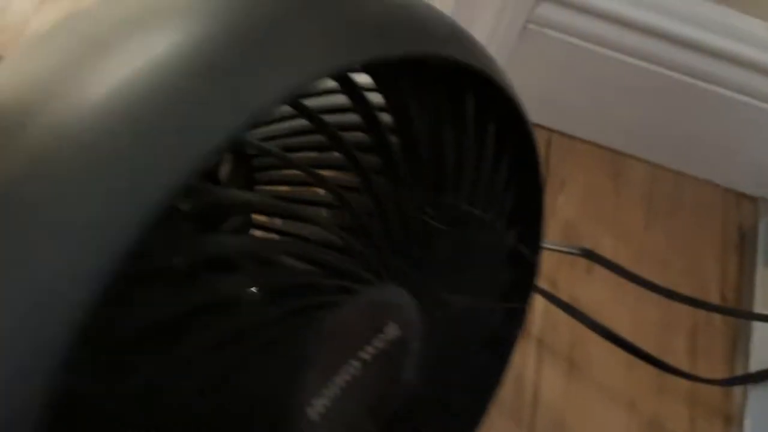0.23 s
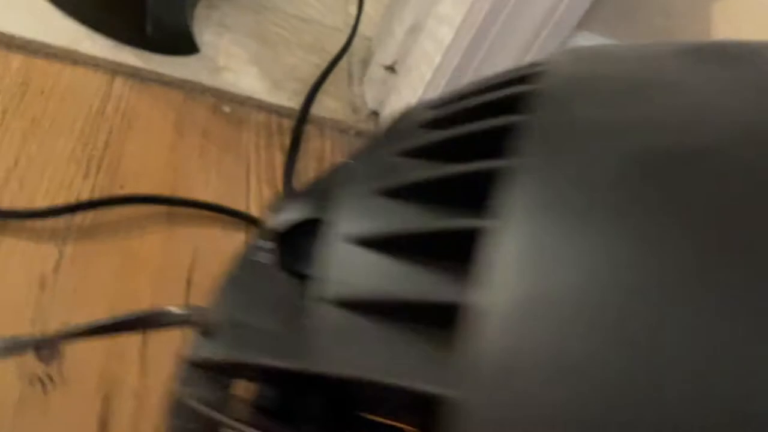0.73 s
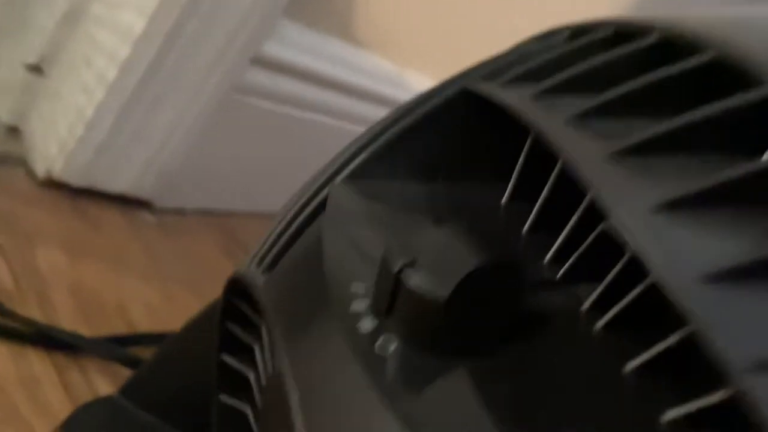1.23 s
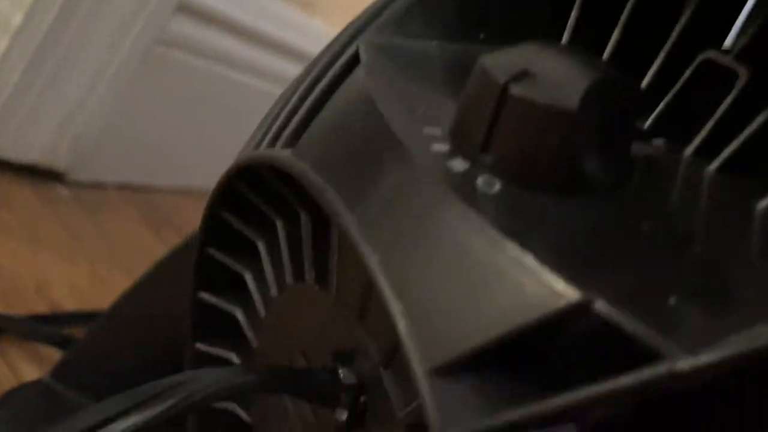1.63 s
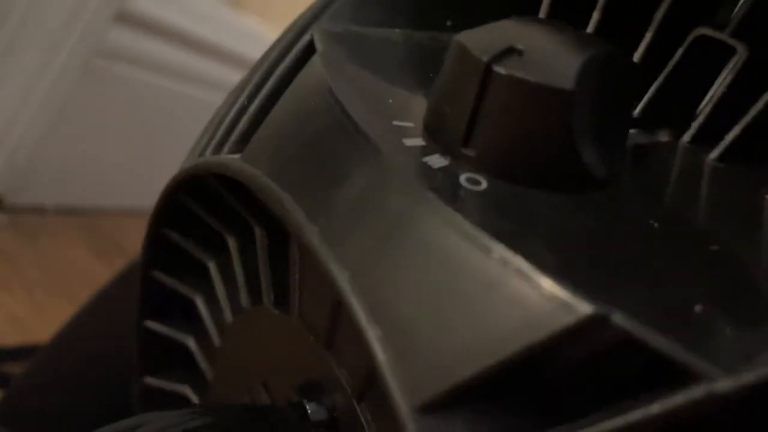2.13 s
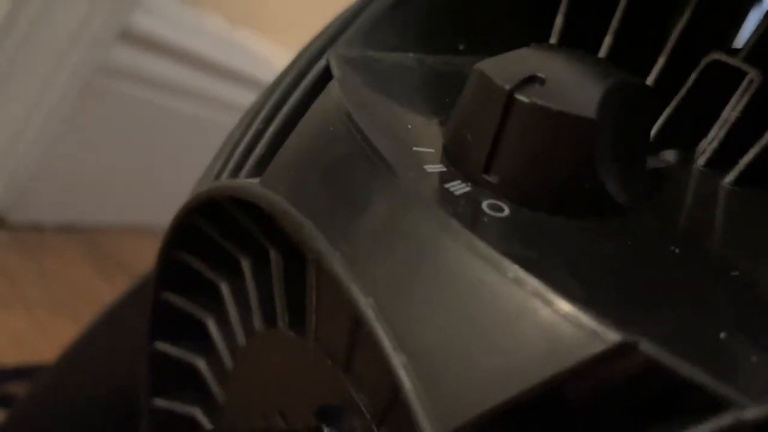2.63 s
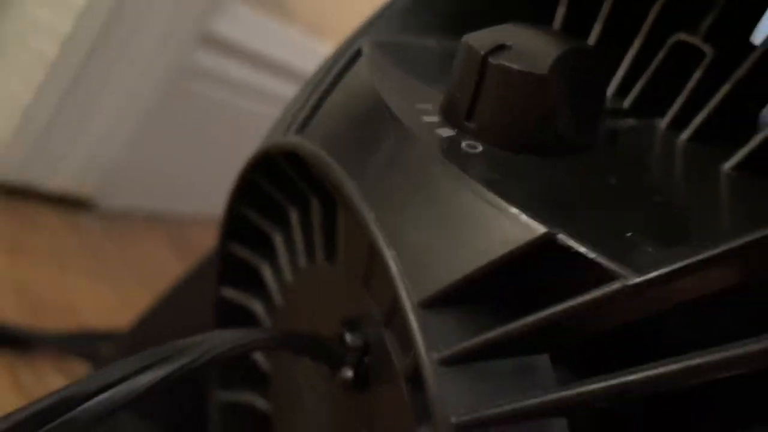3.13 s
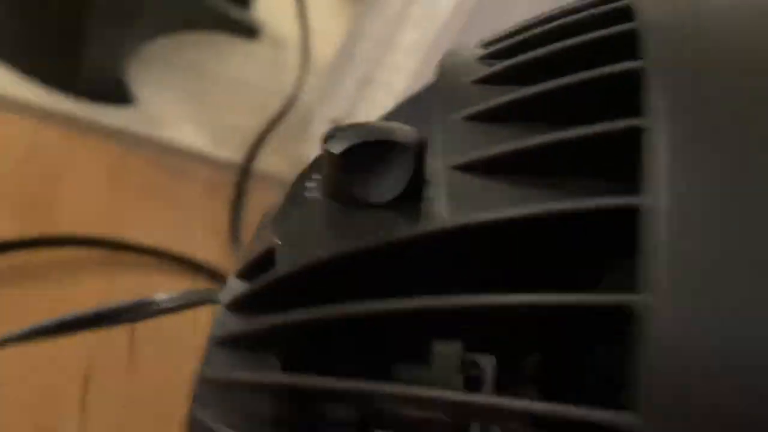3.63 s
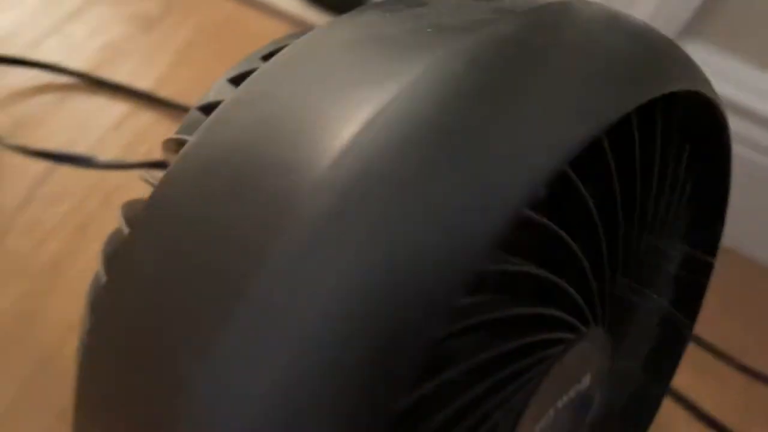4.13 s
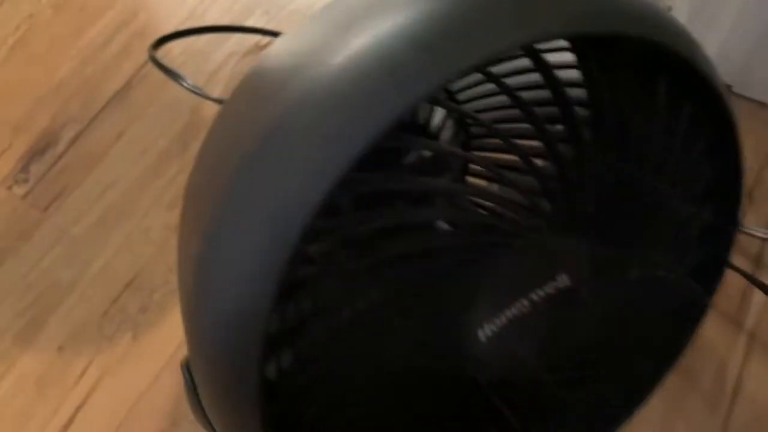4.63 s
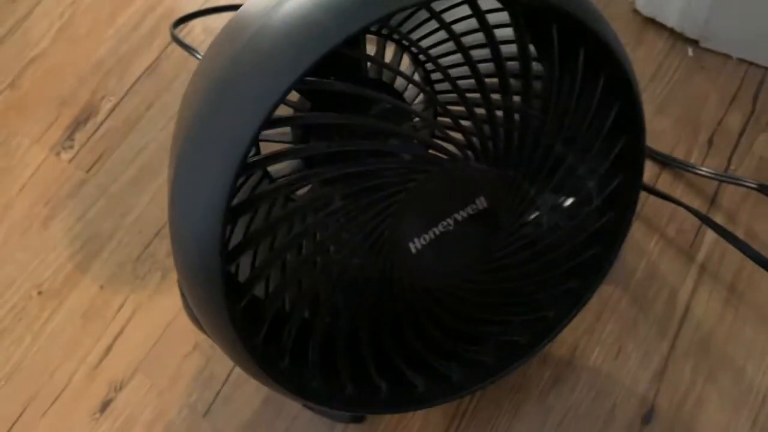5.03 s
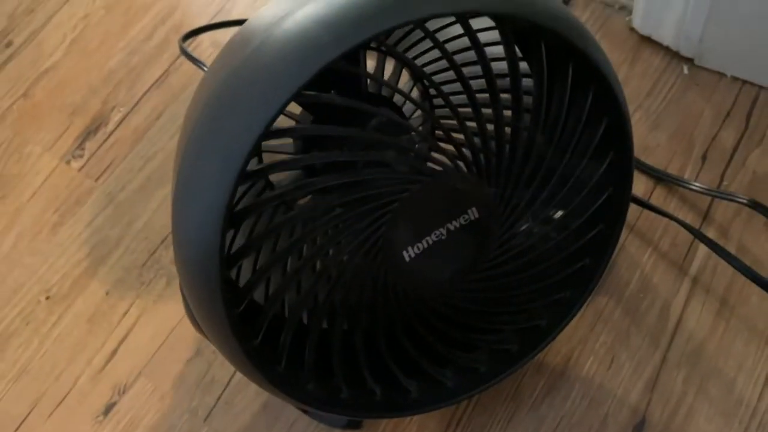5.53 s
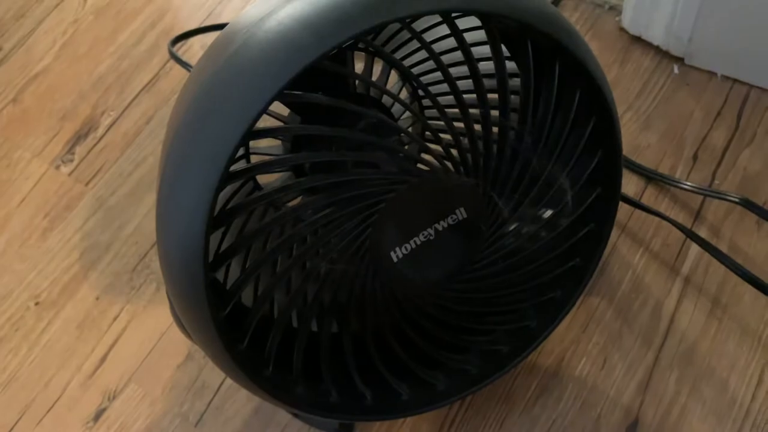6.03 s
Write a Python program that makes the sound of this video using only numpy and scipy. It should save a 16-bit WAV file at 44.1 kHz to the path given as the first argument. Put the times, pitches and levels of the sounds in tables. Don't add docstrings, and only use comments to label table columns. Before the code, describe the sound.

A small electric fan runs indoors, heard very close in stereo. Soft airy rush and a low hum dip briefly as the microphone passes the rim, then swell into a full, buzzing drone behind. Dry ticks and fine crackle ride on top. At nearly four seconds the drone drops away, leaving thinner rush, low wind buffeting and a few hard thumps.

```python
import sys
import numpy as np
from scipy import signal
from scipy.fft import rfft, irfft
from scipy.io import wavfile
from scipy.ndimage import uniform_filter1d

SR = 44100
rng = np.random.default_rng(int(sys.argv[2]) if len(sys.argv) > 2 else 0)


def dump_mix(stems):
    frames = np.atleast_2d(stems).T
    limited = np.clip(frames, -1, 1)
    pcm = np.round(limited * 32767).astype(np.int16)
    wavfile.write(sys.argv[1], SR, pcm)


def natural_amplitude(level_db):
    exponent = np.asarray(level_db, float) / 20
    return 10 ** exponent


N = 277212

BLADE_HZ = 93.33
NEAR_M, BASS_DB_PER_M = 0.31, -28
# (out [s], back [s])
RIM_S = (0.535, 3.91)
# (time [s], share behind fan [0-1], rush level [dB], left minus right [dB], distance [m])
PATH = [(0, 0, -1, 4, 0.091), (.2, 0.02, 1, 0.5, 0.32), (.55, .02, -0.5, -1.2, 0.22),
        (.85, 0.49, -.2, 1, 0.29), (1.35, 0.98, -1.1, -0.7, 0.25), (1.6, 0.73, 1.6, -1, 0.23),
        (2.4, 0.84, 0.9, -1.2, 0.23), (3.2, 0.87, 0.1, -0.5, 0.25), (3.6, 0.41, -1.5, 1.5, 0.27),
        (3.85, 0.12, -1, -1.7, 0.2), (4.3, 0.01, 1.4, -1.6, .28), (4.7, 0.17, 0.8, .2, 0.32),
        (5.25, 0.01, 2, .4, 0.57), (5.75, 0.21, -0.15, 0.5, 0.35), (6.29, .15, 0.2, 1.3, 0.47)]
# (frequency [Hz], right lead [rad], likeness [0-1], left minus right [dB])
PORTS = [(60, .1, .9, .5), (330, -.2, .76, 4.4), (600, .6, .31, 5.9), (1100, -.1, .66, 3.1),
         (1900, .1, .81, 2.6), (3100, -.6, .76, 4.9), (5200, -.05, .72, 3.5), (6100, 1.2, .6, 5),
         (6900, 2.85, .96, .3), (8000, 3.45, .96, 0), (10300, 5.95, .97, 0), (12200, 6.6, .97, 0),
         (14100, 9.15, .95, 0), (15700, 10.1, .95, 0)]
# (time [s], depth [dB], half length [s])
LULLS = [
    (4.965, -4.5, 0.032),
    (5.43, -9, 0.041),
    (6.156, -6.5, .06),
]


def evened(x):
    return x / np.sqrt(np.mean(abs(x) ** 2) + 1e-20)


def curve(rows, t):
    s, *columns = np.transpose(rows)
    return [np.interp(t, s, c) for c in columns]


def colour(rows, hz):
    f, *columns = np.transpose(rows)
    return [np.interp(np.log(hz + 1), np.log(f + 1), c) for c in columns]


def bumps_db(rows, t):
    return sum(db * np.exp(-((t - s) / half_s) ** 2) for s, db, half_s in rows)


def drift(rate_hz):
    b, a = signal.butter(2, rate_hz, fs=SR)
    return evened(signal.lfilter(b, a, rng.standard_normal(N + SR))[SR:])


def sides(pan_db):
    pair = natural_amplitude(np.array([pan_db / 2, -pan_db / 2]))
    return pair / pair.mean(0)


def through_ports(z, hz):
    lead, _, pan_db = colour(PORTS, hz)
    return sides(pan_db) * np.exp(1j * lead * np.array([[-.5], [.5]])) * z


def heave():
    # (time [s], level [dB])
    heave_track = [
        (4.1, -58),
        (5.55, -61),
        (5.95, -43),
        (6.29, -40.5),
    ]
    low_hz, top_hz = 32, 70
    b, a = signal.butter(2, low_hz, "high", fs=SR)
    pressure = evened(signal.lfilter(b, a, drift(top_hz)))
    return natural_amplitude(curve(heave_track, np.arange(N) / SR)[0]) * pressure


def draught():
    # (time [s], level [dB], left minus right [dB])
    draught_track = [(0, -36, 1), (.2, -38, 6), (.3, -45, 3), (4.15, -44, 1), (4.55, -36, -1),
                     (5.0, -33.5, -4), (5.5, -32.5, -3), (6.1, -31, -1), (6.29, -33, -1)]
    # (frequency [Hz], level [dB per Hz])
    buffet_spectrum = [(20, -30.5), (50, -10.5), (80, 6.5), (125, 2), (170, -13.5), (300, -16.5),
                       (600, -39), (1500, -64), (4000, -120)]
    # (time [s], level [dB], left minus right [dB], sharp pop [dB])
    thumps = [
        (4.301, -26, -3, -51),
        (4.73, -32, -3, -47),
        (5.129, -32, .5, -36),
        (5.969, -20.5, -3, -31),
        (6.012, -27, 5, -45),
        (6.09, -18.5, -3, -41),
    ]
    same, lumpy_db = -0.69, 2.5
    t, hz = np.arange(N) / SR, np.fft.rfftfreq(N, 1 / SR)
    shape = natural_amplitude(colour(buffet_spectrum, hz)[0])

    def eddies():
        noise = irfft(rfft(rng.standard_normal(N)) * shape, N)
        return evened(noise) * natural_amplitude(lumpy_db * drift(16.0))

    a, b = eddies(), eddies()
    level_db, pan_db = curve(draught_track, t)
    level_db = level_db - 14 * np.clip(np.minimum(t - .3, 4.1 - t) / 0.12, 0, 1)
    level_db = level_db + 0.47 * bumps_db(LULLS, t) + 0.4
    out = natural_amplitude(level_db) * sides(pan_db) * np.array([a, same * a + np.sqrt(1 - same ** 2) * b])

    u = np.arange(-900, 900) / SR
    eddy = -np.cos(2 * np.pi * 105 * u) * np.exp(-(u / .007) ** 2)
    pop = -np.cos(2 * np.pi * 600 * u) * np.exp(-(u / 0.0018) ** 2)
    for s, db, pan, pop_db in thumps:
        at = round((s + 0.00545) * SR) - 900
        out[:, at:at + 1800] += sides(pan)[:, None] * (natural_amplitude(db) * eddy + natural_amplitude(pop_db) * pop)
    return out


def snaps():
    # (time [s], level [dB])
    snap_times = [
        (.3451, -54),
        (.6564, -62),
        (3.312, -58),
    ]
    x, u = np.zeros(N), np.arange(60)
    for s, db in snap_times:
        x[round(s * SR):][:60] = natural_amplitude(db) * rng.standard_normal(60) * np.exp(-u / 15)
    return np.diff(x, prepend=0) * np.array([[1], [.5]])


def tick_times():
    # (first tick [s], ticks [count], first level [dB], last level [dB])
    tick_runs = [
        (.0893, 3, -52, -57),
        (.6565, 5, -49, -55),
        (2.2737, 3, -47, -55),
        (2.7984, 8, -48, -51),
        (4.4158, 5, -54, -56),
        (5.5083, 5, -57, -55.5),
    ]
    # (time [s], level [dB])
    stray_ticks = [(.3451, -57), (1.2875, -55), (1.516, -53), (2.0632, -53), (2.3201, -57), (2.5381, -54),
                   (2.8988, -54), (5.023, -50)]
    period_s, spread_db = .17486, 1.5
    times = []
    for s, count, first_db, last_db in tick_runs:
        for k in range(count):
            db = first_db + (last_db - first_db) * k / (count - 1)
            times.append((s + k * period_s, db + spread_db * rng.standard_normal()))
    return times + list(stray_ticks)


def ticks():
    grit_per_s, grit_db, spread_db = 120, -64, 5.5
    u = np.arange(400) / SR

    def ring(hz, decay_s):
        return (1 - np.exp(-u / 0.00022)) * np.exp(-u / decay_s) * np.sin(2 * np.pi * hz * u)

    tick = ring(10400, 0.00081) + 0.78 * ring(9440, 0.0011) + .9 * ring(12300, .0003)
    tick += 0.83 * ring(5300, 0.0016) + .7 * ring(10030, 0.0012)
    crackle = ring(5620, .0018) + 1.6 * ring(7300, .0012) + .5 * ring(10500, .0004)

    hits = rng.random(N) < grit_per_s / SR
    grit = natural_amplitude(grit_db + spread_db * np.minimum(rng.exponential(1, N), 3)) * hits
    behind = curve(PATH, np.arange(N) / SR)[0]
    grit *= natural_amplitude(5 * (behind - 1))
    regular = np.zeros(N)
    for s, db in tick_times():
        regular[round(s * SR)] = natural_amplitude(db + 2.5)
    x = signal.oaconvolve(regular, tick)[:N] + signal.oaconvolve(grit, crackle)[:N]
    return irfft(through_ports(rfft(x), np.fft.rfftfreq(N, 1 / SR)), N)


def rush():
    # (frequency [Hz], in front [dB per Hz], behind [dB per Hz])
    air_spectrum = [(22, -94.5, -79), (50, -76.5, -77.5), (74, -58.5, -53.5), (139, -72.5, -59.5),
                    (248, -69.5, -61), (310, -72.5, -61.5), (544, -70, -68), (835, -74.5, -71),
                    (1884, -84.5, -77), (3450, -93.5, -82.5), (5100, -99.4, -92.5), (8160, -104.1, -100.1),
                    (12400, -112.1, -108.4), (14000, -113.1, -109.1)]
    # (frequency [Hz], width [Hz], in front [dB], behind [dB])
    resonances = [(373.5, 17.2, 8, -2.5), (660, 79, 4, .5), (1230, 121, 7, 6), (1615, 80, 5, 2.5),
                  (2520, 264, 5.5, 3.5), (2160, 77, 1.5, 5), (5700, 110, 0.5, 5.5), (7300, 320, 5.5, 6.5),
                  (9900, 1100, 2.5, 4.5), (15500, 430, 4.5, 3.5)]
    # (time [s], level [dB], half length [s])
    jets = [
        (.13, 6, .09),
        (1.8, 2, 0.22),
        (3.52, 2, .08),
    ]
    patchy_db, flicker_db, chop = 0.99, 1.5, 0.12
    hush_db, hush_s, hush_hz = -7, 0.05, 150
    frames, hz = N // 256 + 5, np.fft.rfftfreq(1024, 1 / SR)
    t = np.arange(frames)[:, None] * 256 / SR
    behind, level_db, pan_db, metres = curve(PATH, t)
    a, b, c, d, patches = np.moveaxis(rng.standard_normal((frames, 513, 5)), -1, 0)

    front_db, back_db = colour(air_spectrum, hz)
    field_db = front_db + behind * (back_db - front_db) + level_db
    for f, width, front, back in resonances:
        field_db += (front + behind * (back - front)) / (1 + ((hz - f) / width) ** 2)
    patches = uniform_filter1d(uniform_filter1d(patches, size=10, axis=0), size=10, axis=1)
    field_db += patchy_db * evened(patches)
    flicker = uniform_filter1d(rng.standard_normal((frames, 1)), size=2, axis=0)
    field_db += flicker_db * flicker * np.clip(hz / 6000, 0, 1.5)
    field_db += bumps_db(jets, t) / (1 + (5200 / (hz + 1)) ** 6)
    field_db += bumps_db([(s, hush_db, hush_s) for s in RIM_S], t) / (1 + (hz / hush_hz) ** 4)

    beside = np.exp(-((behind - .5) / 0.2) ** 2)
    low_db = 4 * beside + BASS_DB_PER_M * (metres - NEAR_M)
    field_db += low_db / (1 + (hz / 380) ** 4) / (1 + (60 / (hz + 1)) ** 4)
    field_db += -4 * beside * np.exp(-(np.log((hz + 1) / 600) / 0.17) ** 2)

    same = np.clip(colour(PORTS, hz)[1], 0, 1)
    left = a + 1j * b
    z = np.array([left, same * left + np.sqrt(1 - same ** 2) * (c + 1j * d)])
    z *= through_ports(1, hz)[:, None] * natural_amplitude(field_db)
    z *= sides(pan_db * np.clip((7000 - hz) / 1500, 0, 1))
    x = signal.istft(z.swapaxes(1, 2), nperseg=1024, noverlap=768)[1][:, :N]
    return natural_amplitude(16.0) * x * (1 + chop * np.cos(2 * np.pi * BLADE_HZ * np.arange(N) / SR + .5))


def overtone_db(hum_db, behind_fan_db, slope, floor_db):
    return np.maximum(behind_fan_db + slope * (hum_db + 28), floor_db)


def rotor():
    # (time [s], blade tone [dB], motor hum [dB], left minus right [dB])
    tone_track = [(0, -31.5, -34.5, -1), (.1, -32.5, -40, 4), (.4, -34.5, -38, -0.5), (.65, -30, -37.5, 12),
                  (.89, -22.5, -31, 7.5), (1.07, -26.5, -32, 6.5), (1.5, -21, -28, 0.2),
                  (2.1, -21, -27, .1), (2.6, -22, -27.5, -0.5), (3.0, -21, -29, 0), (3.5, -19.6, -30, 0.5),
                  (3.68, -20.5, -30.5, -1.5), (3.83, -26.5, -47, -.8), (4.05, -36.5, -39, -1.5),
                  (4.3, -33.5, -37, -2.5), (4.75, -37, -41.5, -2), (5.15, -40, -44, 9), (6.29, -36, -43, 4)]
    # (multiple of blade tone [-], level [dB])
    overtones = [(2, 0), (3, -1.2), (4, -8), (5, -15), (6, -19.5), (8, -23.5), (10, -19.5), (11, -25),
                 (13, -19)]
    # (time [s], right port lead [rad])
    lead_track = [(.3, 1), (.9, 1), (1.5, 0.21), (2.6, 0.38), (3.2, -0.021), (3.6, -0.85), (3.85, -1.84),
                  (4.05, -0.15)]
    hum_hz, blade_turn, hum_turn = 120.5, .39, .44
    hum_lag_rad, leak_db, steady, waver = 0.22, -44, .05, .15
    out_width_s, back_width_s = 0.14, 0.11
    t = np.arange(N) / SR
    blade_db, hum_db, pan_db = curve(tone_track, t)
    front_db = -3 * (t > RIM_S[1])
    over_db = overtone_db(hum_db, -37.5, 1.15, -53.5) + front_db
    second_db = overtone_db(np.maximum(hum_db, blade_db - 9), -36.5, 1.41, -59) + front_db
    lull_db = bumps_db(LULLS, t)
    blade_db, hum_db = blade_db + lull_db, hum_db + lull_db

    face = np.tanh((t - RIM_S[0]) / out_width_s) * np.tanh((RIM_S[1] - t) / back_width_s)
    port = np.array([[-1], [1]])
    lead = curve(lead_track, t)[0] / 2
    blade = 2 * np.pi * (BLADE_HZ * t + blade_turn)
    hum = 2 * np.pi * (hum_hz * t + hum_turn)
    out = face * natural_amplitude(blade_db) * (1 + steady * drift(5.9)) * np.sin(blade + lead * port)
    out += face * natural_amplitude(hum_db) * sides(1.7)[:, None] * np.cos(hum + (lead - hum_lag_rad) * port)
    octave_db = -57 + BASS_DB_PER_M * np.maximum(curve(PATH, t)[3] - NEAR_M, 0)
    out += natural_amplitude(octave_db) * sides(2.4)[:, None] * (1 + 0.51 * drift(3.5)) * np.cos(2 * hum)
    for k, db in overtones:
        wobble = 1 + waver * (k / 3) ** 0.34 * (drift(5.3) + 1j * drift(7.6))
        tone = (wobble * np.exp(1j * (k * blade + (lead - .3) * port))).imag
        pan = sides(2.6 * np.minimum(k, 5) - 2.5)[:, None]
        out += natural_amplitude((second_db if k == 2 else over_db) + db) * pan * tone
    leak = natural_amplitude(leak_db) * port * (np.cos(blade) + .6 * np.sin(hum))
    return np.sqrt(2) * (out * sides(pan_db) + leak)


def scene():
    return heave() + draught() + snaps() + ticks() + rush() + rotor()


def top_cut(x):
    return signal.sosfilt(signal.butter(12, 15760, fs=SR, output="sos"), x)


def record(dry):
    bass_cut_hz, edge_hz = 38, 15800
    hz = np.fft.rfftfreq(N, 1 / SR)
    response = (hz < edge_hz) / (1 + (bass_cut_hz / (hz + 1)) ** 4)
    return top_cut(irfft(rfft(dry) * response, N))


dry = scene()
out = record(dry)
dump_mix(out)
```